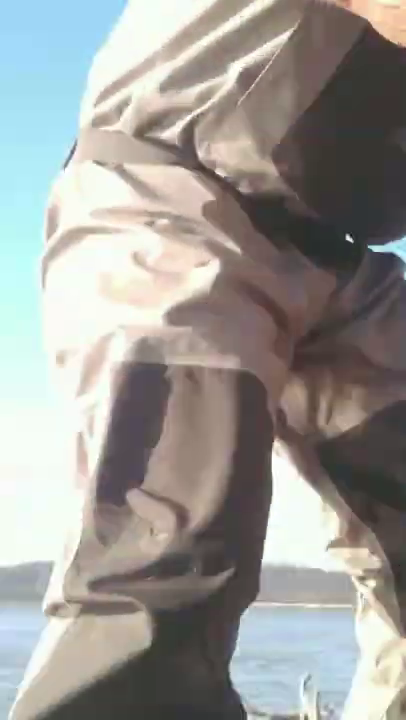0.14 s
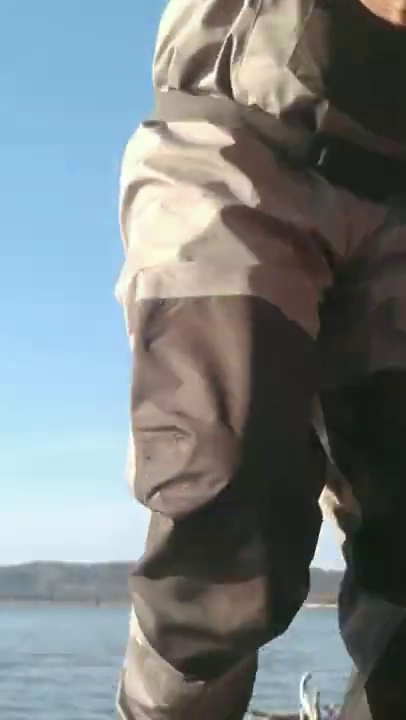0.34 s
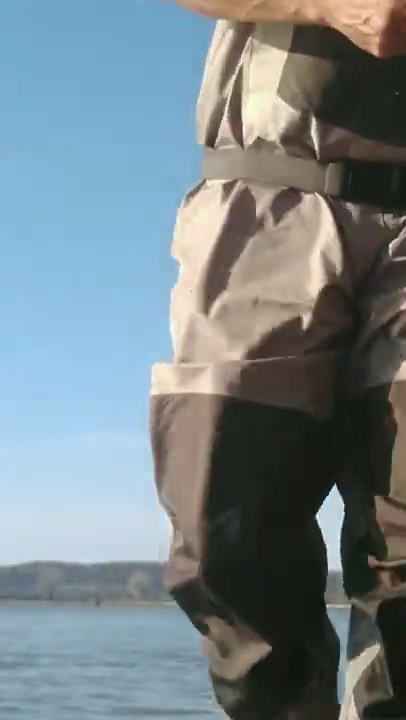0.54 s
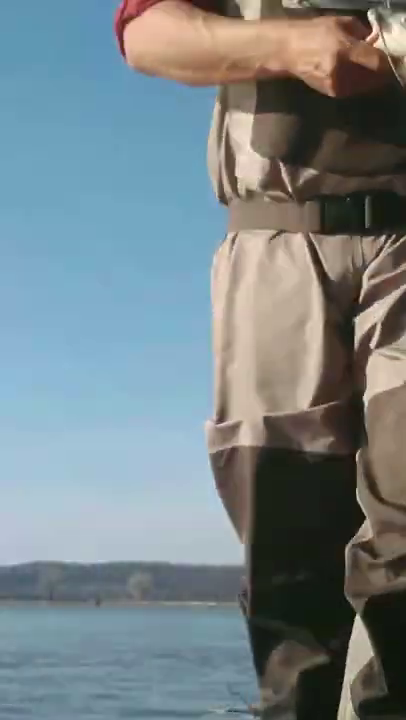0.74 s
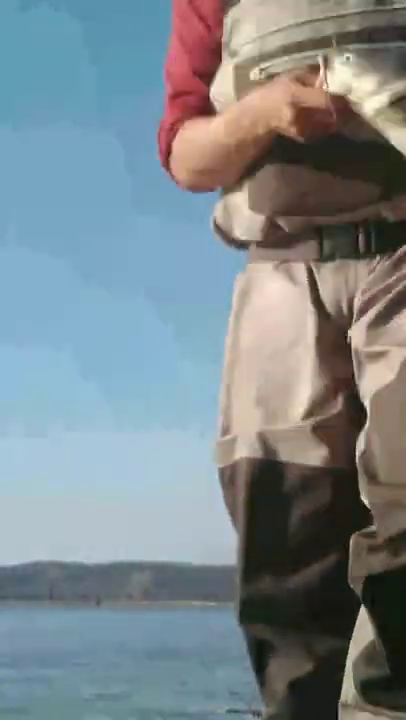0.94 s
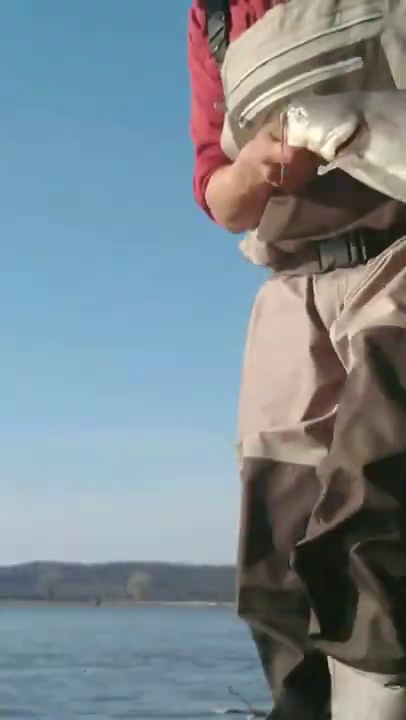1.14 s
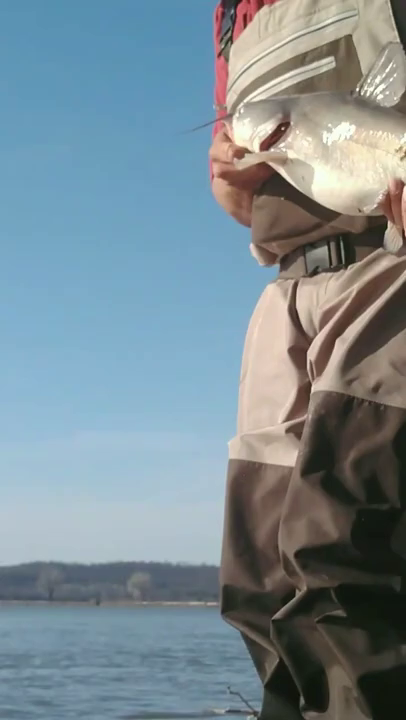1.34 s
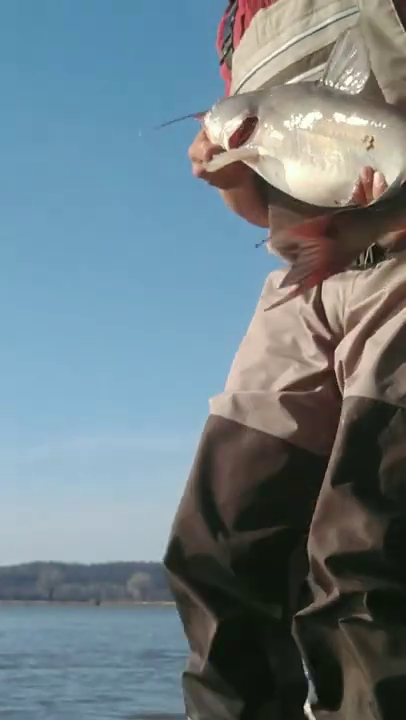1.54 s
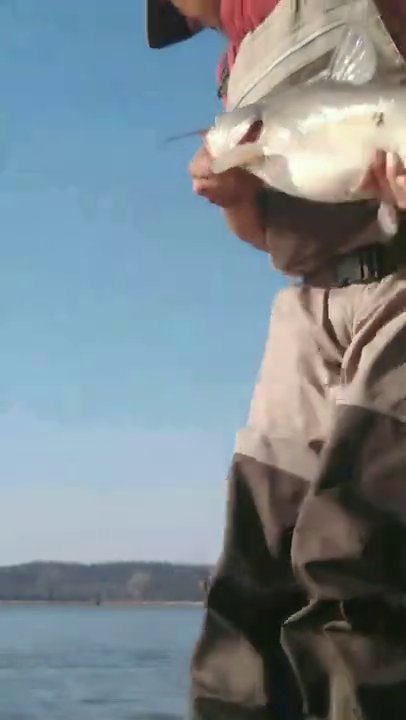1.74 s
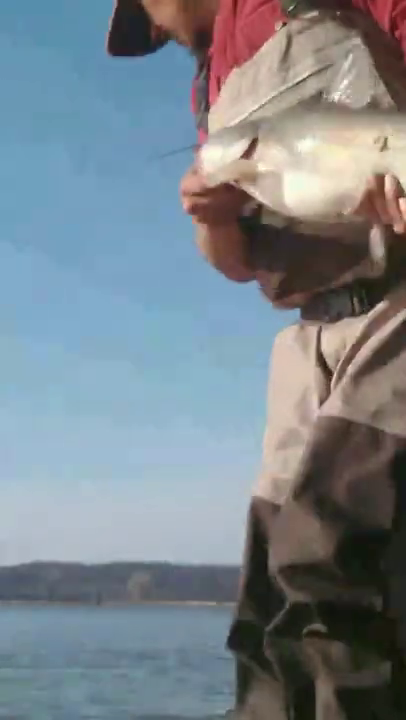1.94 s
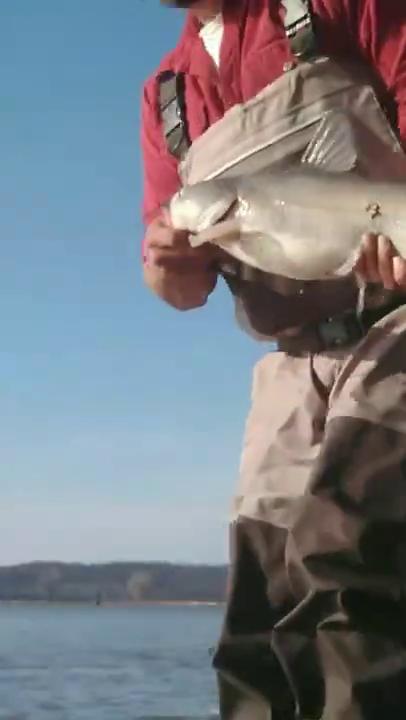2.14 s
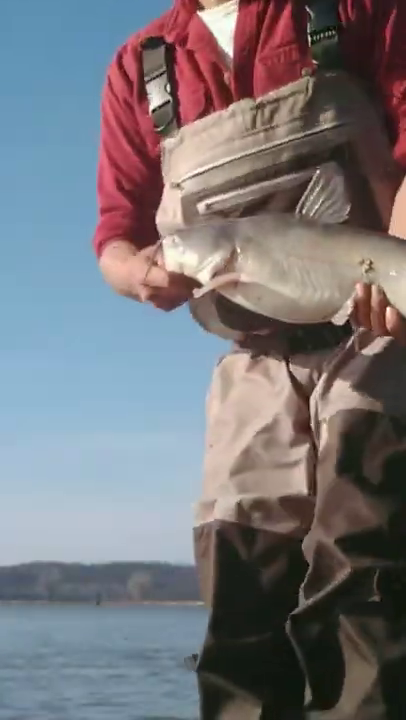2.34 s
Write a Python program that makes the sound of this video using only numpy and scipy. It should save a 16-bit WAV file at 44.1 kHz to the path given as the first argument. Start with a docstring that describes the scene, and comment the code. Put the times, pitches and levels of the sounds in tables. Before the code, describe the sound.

Close, dry rustling of baggy wader cloth as the wearer straightens up and shifts; dense snaps and hollow pops come first, then lighter intermittent scuffs, picked up by a phone in stereo outdoors with little background.

```python
"""A quick hissing rub of stiff waterproof waders, dotted with snaps and hollow plucks, is heard first.
The wearer straightens up and shifts close to a phone outdoors; softer strokes follow over quiet air.
Cloth strokes are grainy filtered noise, plucks and thuds are short decaying sines, creases snap as a
crack plus a noise burst, and drags along a fold are noise bands that glide in pitch.
The ports at the two ends of the phone are each subtracted, delayed, from the other for left and right."""
import sys
import numpy as np
from scipy import signal
from scipy.fft import rfft, irfft
from scipy.io import wavfile
from scipy.ndimage import uniform_filter1d

SR = 44100
rng = np.random.default_rng(int(sys.argv[2]) if len(sys.argv) > 2 else 0)


def master_out(mix):
    """Clip the mix to full scale and print it as 16-bit PCM to the path in sys.argv[1]."""
    frames = np.transpose(np.atleast_2d(mix))
    ceiling = np.clip(frames, -1, 1)
    pcm = np.round(ceiling * 32767).astype(np.int16)
    wavfile.write(sys.argv[1], SR, pcm)


def natural_amplitude(level_db):
    """Convert a level in decibels to a linear amplitude factor, elementwise."""
    exponent = np.asarray(level_db, float) / 20
    return 10 ** exponent


N = 105046
T = np.arange(N) / SR
F = np.fft.rfftfreq(N, 1 / SR)


def unit(x):
    """Scale to rms 1."""
    return x / np.sqrt(np.mean(x ** 2))


def colour(x, table, part=1):
    """Filter by a table of Hz and dB, read along log frequency; part scales the dB."""
    hz, db = np.array(table, float).T
    gain_db = part * np.interp(np.log(F + 1), np.log(hz), db)
    return irfft(rfft(x) * natural_amplitude(gain_db), N)


def late(x, lag_s):
    """Delay by lag_s seconds; a negative lag comes early."""
    return irfft(rfft(x) * np.exp(-2j * np.pi * F * lag_s), N)


def resonance(f, hz, width):
    """Response of two equal resonators in a row, centred on hz."""
    return 1 / (1 + 1j * (f ** 2 - hz ** 2) / (width * (f + 1))) ** 2


def walk(rate):
    """Random levels of rms 1, a new one every 1 / rate seconds, with straight slews between."""
    hold = int(SR / rate)
    steps = np.repeat(rng.standard_normal(N // hold + 1), hold)
    return unit(uniform_filter1d(steps, hold)[:N])


def scrape(per_s, spread_db, grain_s, grain_db):
    """Three noises that share one grain of slips: small jumps in level that die away."""
    hit = rng.random(N) < per_s / SR
    size = natural_amplitude(spread_db * rng.exponential(size=N))
    decay = np.exp(-1 / (grain_s * SR))
    slips = unit(signal.lfilter([1], [1, -decay], hit * size))
    return unit((1 + natural_amplitude(grain_db) * slips) * rng.standard_normal((3, N)))


def ports(x, alike, lag_s):
    """Row 0 reaches both ports, the second lag_s later; rows 1 and 2 reach one port each."""
    shared = np.array([x[0], late(x[0], lag_s)])
    return np.sqrt(alike) * shared + np.sqrt(1 - alike) * x[1:]


def ring(start_s, db, hz, t60_s, rise_s):
    """A sine that swells quickly and dies away."""
    u = np.clip(T - start_s, 0, None)
    env = (1 - np.exp(-u / rise_s)) ** 2 * np.exp(-np.log(1000) * u / t60_s)
    return natural_amplitude(db) * env / env.max() * np.sin(2 * np.pi * hz * u)


# Rubbing, stroke after stroke. Each row: time in seconds, hiss level in dB and folds level in dB,
# both before their trims; levels glide from row to row.
STROKES = [(0, -69, -56.5), (.024, -77, -66), (0.087, -49.5, -47), (.102, -44, -43.5), (0.136, -50, -49.5),
           (.156, -42, -41.5), (.18, -51.5, -37.5), (.238, -53.5, -45.5), (.311, -61.5, -49.5),
           (0.386, -58.5, -54), (0.412, -55.5, -39.5), (0.438, -61.5, -56), (0.496, -55.5, -53.5),
           (0.554, -45, -43), (.613, -49.5, -44.5), (0.631, -61, -52.5), (.69, -52, -49), (.78, -64, -55.5),
           (.835, -53.5, -50.5), (.885, -56.5, -57), (0.966, -59.5, -54), (1.003, -74, -68.5),
           (1.068, -69, -61), (1.108, -58.5, -55), (1.201, -67, -64), (1.225, -73, -72),
           (1.305, -72.5, -68), (1.312, -62, -65.5), (1.344, -62, -60.5), (1.358, -49, -45.5),
           (1.367, -43.5, -47), (1.421, -57.5, -53), (1.452, -57, -49.5), (1.477, -65.5, -60),
           (1.52, -68, -66.5), (1.525, -48.5, -49), (1.58, -63, -60), (1.605, -52.5, -53),
           (1.66, -67, -60.5), (1.692, -61, -55.5), (1.738, -73.5, -68.5), (1.846, -70.5, -62.5),
           (1.856, -58.5, -60.5), (1.942, -50, -52), (1.991, -60, -55), (2.007, -57, -50.5),
           (2.045, -60.5, -55.5), (2.071, -68, -57.5), (2.101, -71.5, -65), (2.112, -59, -51),
           (2.153, -55, -51.5), (2.176, -60.5, -55.5), (2.225, -56.5, -53.5), (2.264, -63.5, -56),
           (2.281, -72, -69.5), (2.38, -75, -67.5)]
# Spectrum of the cloth hiss. Each row: frequency in Hz, relative density in dB per Hz.
HISS_SPECTRUM = [(600, -47), (1300, -63), (2000, 6), (3200, 0.5), (3900, -2.5), (4700, 3), (6000, 0),
                 (8000, 3), (10000, -2.5), (13000, -4.5), (15000, -10.5)]
# Hollow resonances of the baggy folds. Each row: centre in Hz, nominal width in Hz, relative gain in dB.
FOLD_RESONANCES = [(223, 64, -4.5), (424, 460, 8.5), (560, 15, -33), (750, 140, -5), (950, 133, 1.5),
                   (1312, 120, 0), (1540, 175, -9), (2830, 3000, -52)]
# Spectrum of the low rumble. Each row: frequency in Hz, relative density in dB per Hz.
RUMBLE_SPECTRUM = [(30, -24), (60, -7.5), (100, -4), (200, -7), (300, -19), (600, -48.5)]
HISS_TRIM_DB, FOLDS_TRIM_DB, RUMBLE_TOP_DB = 5.5, 3.5, -43.5
HISS_FLICKER_DB, FOLD_FLICKER_DB = 1.2, 1.6  # rms
RUMBLE_FOLLOWS = 0.55  # dB of rumble per dB of folds


def cloth_hiss():
    """Cloth slides on cloth in many fine slips, heard as flickering hiss."""
    hiss = scrape(per_s=500., spread_db=2., grain_s=.0012, grain_db=-9.)
    time, hiss_db, _ = np.array(STROKES, float).T
    level_db = np.interp(T, time, hiss_db) + HISS_TRIM_DB + HISS_FLICKER_DB * walk(90.)
    return unit(colour(hiss, HISS_SPECTRUM)) * natural_amplitude(level_db)


def hollow_folds():
    """The rubbing drives the hollow folds, whose resonances boom and flicker one by one."""
    push = rfft(scrape(per_s=400., spread_db=2.2, grain_s=.003, grain_db=-5.))
    folds = 0
    for hz, width, db in FOLD_RESONANCES:
        boom = irfft(push * resonance(F, hz, 1.43 * width), N)
        folds = folds + natural_amplitude(db + FOLD_FLICKER_DB * walk(45.08)) * boom
    time, _, folds_db = np.array(STROKES, float).T
    return unit(folds) * natural_amplitude(np.interp(T, time, folds_db) + FOLDS_TRIM_DB)


def low_rumble():
    """Coarse slips rumble beneath the folds and follow their strokes more gently."""
    rumble = scrape(per_s=60., spread_db=2.5, grain_s=.006, grain_db=-6.)
    time, _, folds_db = np.array(STROKES, float).T
    follow_db = RUMBLE_FOLLOWS * (folds_db - folds_db.max())
    return unit(colour(rumble, RUMBLE_SPECTRUM)) * natural_amplitude(np.interp(T, time, follow_db) + RUMBLE_TOP_DB)


def rubbing():
    """Strokes of cloth on cloth: scattered hiss, more focused folds and a nearly shared rumble."""
    hiss = ports(cloth_hiss(), alike=0.053, lag_s=5e-5)
    folds = ports(hollow_folds(), alike=0.72, lag_s=-0.000082)
    return hiss + folds + ports(low_rumble(), alike=0.95, lag_s=5e-5)


# Folds that pluck. Each row: time in seconds, peak envelope in dB before the trim, pitch in Hz,
# time to fall 60 dB in seconds.
FOLD_PLUCKS = [(0.106, -31.5, 977, 0.025), (0.152, -16.5, 562, 0.026), (0.184, -28.5, 994, 0.048),
               (0.2155, -24.5, 832, 0.031), (0.256, -32.5, 570, 0.065), (0.274, -29.5, 622, 0.04),
               (0.346, -25, 576, 0.067), (0.359, -27.5, 586, 0.062), (0.401, -30.5, 585, 0.074),
               (0.408, -32.5, 860, 0.02), (0.54, -28.5, 405, 0.042), (0.606, -26.5, 560, 0.013),
               (1.08, -43, 460, 0.051), (1.1, -23, 495, 0.01), (1.42, -37, 740, 0.026),
               (1.441, -47, 985, 0.041), (1.806, -43.5, 710, 0.015), (2.109, -34, 385, 0.046),
               (2.197, -40, 610, 0.014), (2.206, -35.5, 724, 0.012)]
PLUCK_TRIM_DB, PLUCK_RISE_S = -3.5, .0016


def plucks():
    """A taut fold lets go and rings a few cycles."""
    x = 0
    for time, db, hz, t60_s in FOLD_PLUCKS:
        # the swell begins one rise time early
        x = x + ring(time - PLUCK_RISE_S, db + PLUCK_TRIM_DB, hz, t60_s, PLUCK_RISE_S)
    return np.array([x, late(x, -0.00018)])


# Creases that snap. Each row: start in seconds, level in dB, centre in Hz,
# peak of the first crack in dB over that level.
CREASE_SNAPS = [(0.0358, -44.5, 7400, -2), (0.0757, -34, 6750, 8), (0.0965, -29, 6700, 8),
                (0.1047, -27.5, 5500, -9), (0.1526, -30, 8250, -6), (0.1718, -34, 8000, 0),
                (0.186, -25, 3200, -10), (0.1878, -26, 8500, 6), (0.2465, -28, 8000, 2),
                (0.2723, -37, 6700, -2), (0.403, -35.5, 3000, 7.5), (0.606, -32.5, 8050, -2),
                (0.7047, -38, 8300, 11), (0.7334, -36.5, 8700, 15), (1.4877, -42, 8800, -6),
                (1.5293, -27, 7000, 17), (1.6005, -37.5, 9000, 7), (1.6776, -41.5, 8360, 4),
                (2.0049, -37, 8200, -2)]
BURST_WIDTH = 8e-5  # times centre squared: brighter snaps are broader
CRACK_WIDTH = .9  # times centre
SNAP_T60_S, CRACK_FAR_DB = .022, -12.  # time to fall 60 dB; crack gain at the second port


def snaps():
    """A stiff crease flips: one sharp broad crack, then a bright burst of a few milliseconds."""
    size = 2048
    bursts, cracks = np.zeros((3, N)), np.zeros(N)
    u, f = np.arange(size) / SR, np.fft.rfftfreq(size, 1 / SR)
    decay = np.exp(-np.log(1000) * u / SNAP_T60_S)
    for start_s, db, hz, crack_db in CREASE_SNAPS:
        noise = rfft(rng.standard_normal((3, size)))
        burst = irfft(noise * resonance(f, hz, BURST_WIDTH * hz ** 2), size)
        crack = irfft(resonance(f, hz, CRACK_WIDTH * hz), size)
        i = int(start_s * SR)
        bursts[:, i:i + size] += natural_amplitude(db) / 2 * unit(burst) * decay
        cracks[i:i + size] += natural_amplitude(db + crack_db) * crack / np.abs(crack).max()
    far_crack = natural_amplitude(CRACK_FAR_DB) * late(cracks, 1e-4)
    return ports(bursts, alike=0.13, lag_s=5e-5) + np.array([cracks, far_crack])


# A hand or strap drags along a fold. Each row: start in seconds, end in seconds,
# first pitch in Hz, last pitch in Hz, level in dB.
DRAGS = [(0.732, 0.852, 1117, 1024, -51), (.82, 0.908, 950, 493, -54), (2.108, 2.173, 944, 1043, -49.5)]
SLIDE_SMOOTH_S = .012  # longer smoothing makes a narrower band


def slide():
    """The hollow of a fold changes under the drag: a rough band that glides in pitch."""
    x = 0
    for start_s, end_s, from_hz, to_hz, db in DRAGS:
        hz = np.interp(T, (start_s, end_s), (from_hz, to_hz))
        phase = 2 * np.pi * np.cumsum(hz) / SR
        a, b = uniform_filter1d(rng.standard_normal((2, N)), int(SLIDE_SMOOTH_S * SR))
        band = unit(a * np.cos(phase) + b * np.sin(phase))
        progress = np.clip((T - start_s) / (end_s - start_s), 0, 1)
        env = np.abs(np.sin(np.pi * progress)) ** .5
        x = x + band * env * natural_amplitude(db)
    return np.array([x, late(x, -0.000053)])


# Dull bumps of the legs. Each row: start in seconds, peak envelope in dB before the trim, pitch in Hz.
LEG_BUMPS = [(0.101, -53, 182), (0.539, -37, 105), (1.356, -54, 178), (1.396, -44, 131), (1.884, -50, 83.4),
             (1.975, -42.5, 169), (2.01, -48.5, 258)]
BUMP_T60_S, BUMP_RISE_S, BUMP_TRIM_DB = 0.031, 0.00049, 12.5


def bumps():
    """The legs knock the baggy cloth: a soft low thud, louder at the second port."""
    x = sum(ring(start_s, db + BUMP_TRIM_DB, hz, BUMP_T60_S, BUMP_RISE_S) for start_s, db, hz in LEG_BUMPS)
    return np.array([x, natural_amplitude(3.0) * late(x, 5e-5)])


# Spectrum of the open air. Each row: frequency in Hz, relative density in dB per Hz.
AIR_SPECTRUM = [(30, 50), (80, 24), (300, 33), (800, 17), (1500, 11), (4000, -43.5), (8000, -23),
                (14000, 9), (16300, -61)]
AIR_LEVEL_DB = -62.5  # rms


def open_air():
    """Quiet steady air: coloured noise that is almost the same at both ports."""
    air = unit(colour(rng.standard_normal((3, N)), AIR_SPECTRUM)) * natural_amplitude(AIR_LEVEL_DB)
    return ports(air, alike=0.99, lag_s=3e-5)


def scene():
    """The sound at the two ports, over the quiet open air."""
    return rubbing() + plucks() + snaps() + slide() + bumps() + open_air()


def roll_off(x):
    """The treble ends steeply here."""
    return signal.sosfilt(signal.butter(12, 16520, fs=SR, output="sos"), x)


# Tone of left against right, shared half each. Each row: frequency in Hz, left over right in dB.
SIDE_TONE = [(60, 13), (200, -0.5), (1100, 2), (2400, 2.5), (4700, 3.2), (7500, 10.5), (10500, 4.5),
             (12000, 1)]
# Overall tone at the two ends of the range. Each row: frequency in Hz, gain in dB.
END_TONE = [(25, -22), (70, 0), (15000, 0), (16000, -22), (16600, -40)]
PORT_LAG_S, CANCEL = 0.0004228, .99  # delay and gain of the subtracted port


def record(dry):
    """Each side is one port minus the other, delayed by the length of the phone."""
    left, right = dry - CANCEL * late(dry[::-1], PORT_LAG_S)
    sides = np.array([colour(left, SIDE_TONE, .5), colour(right, SIDE_TONE, -.5)]) / 2
    mix = colour(sides, END_TONE)
    return roll_off(mix)


dry = scene()
out = record(dry)
master_out(out)
```